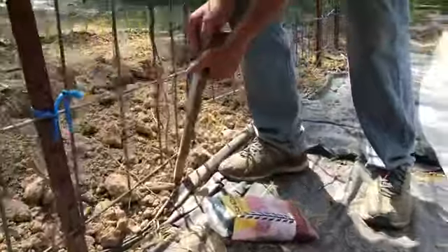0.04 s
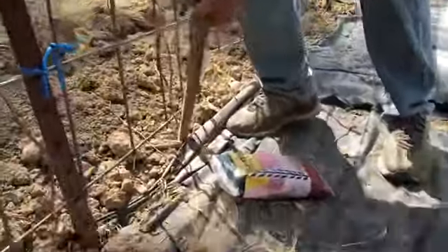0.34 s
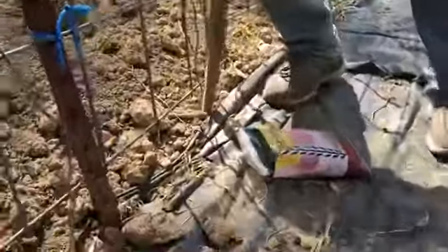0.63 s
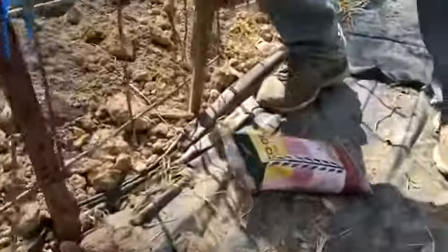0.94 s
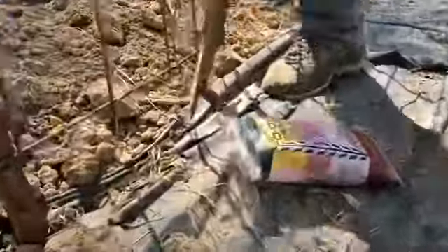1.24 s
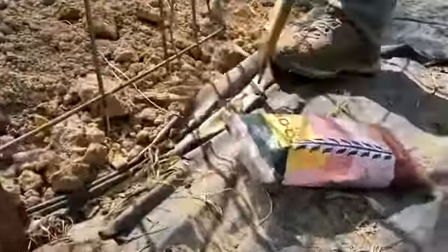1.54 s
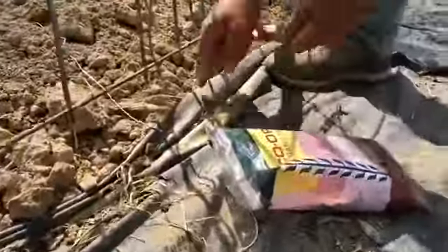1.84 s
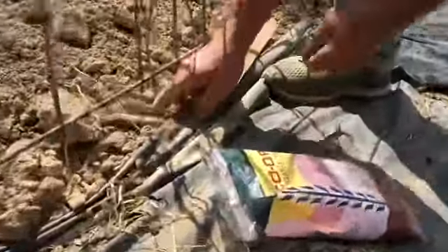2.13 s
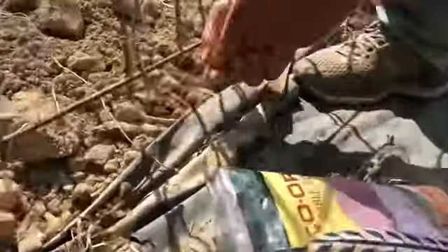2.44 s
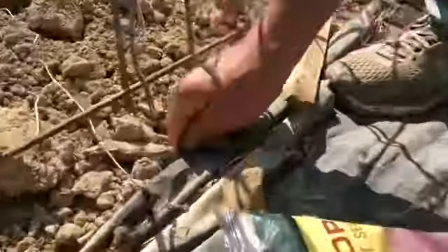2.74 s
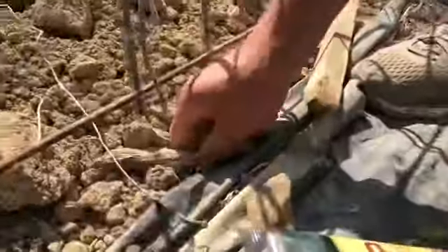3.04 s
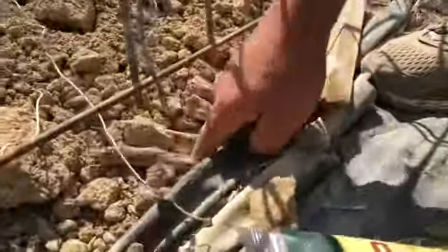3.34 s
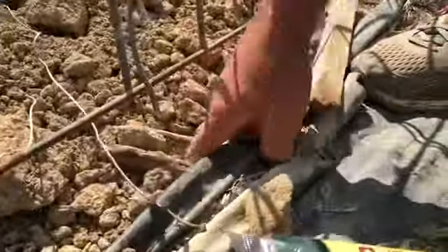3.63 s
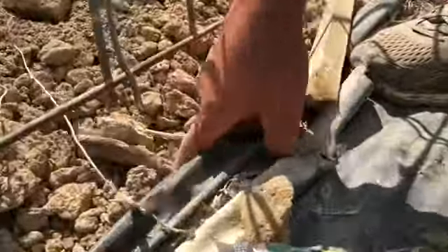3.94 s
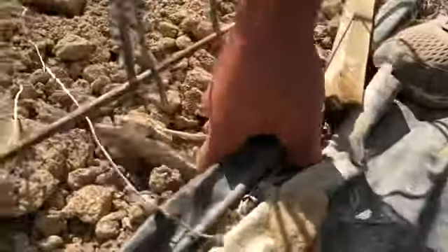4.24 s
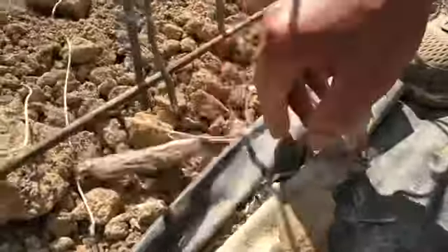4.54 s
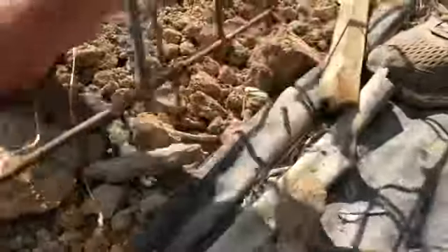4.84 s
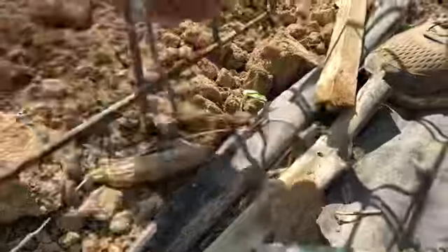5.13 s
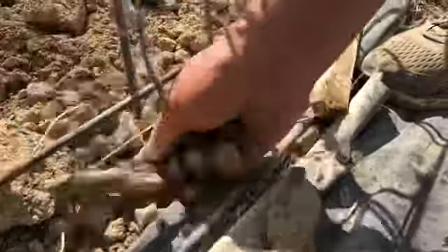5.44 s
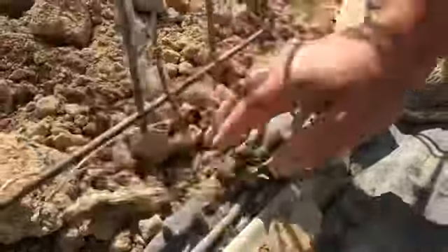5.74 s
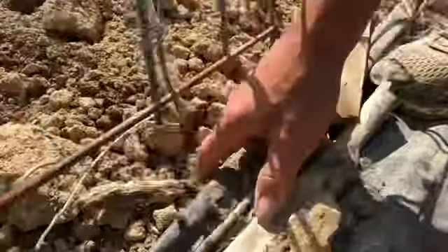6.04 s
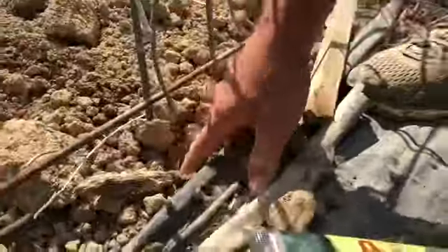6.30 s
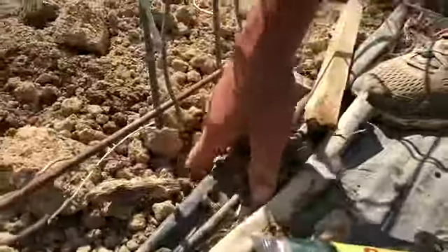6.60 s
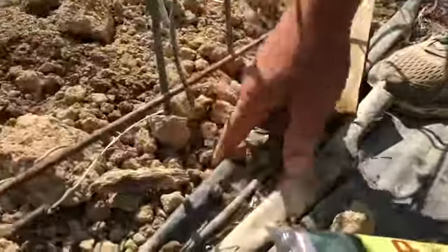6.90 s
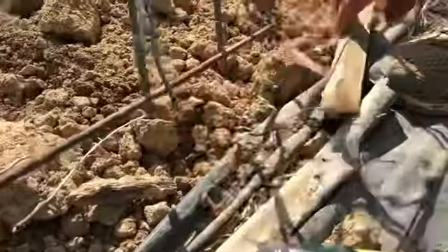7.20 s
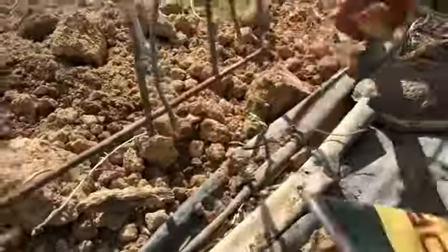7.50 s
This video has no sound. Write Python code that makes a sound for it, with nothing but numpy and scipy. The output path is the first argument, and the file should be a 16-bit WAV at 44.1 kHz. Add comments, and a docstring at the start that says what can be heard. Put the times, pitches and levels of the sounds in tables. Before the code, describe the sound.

Close, gritty rustling of a hand working loose garden earth, with ticking crumbs, soft shoe bumps and faint high birdsong.

```python
"""Fingers rake and press loose, dry soil: sowing by hand in a garden bed, a phone close above it.
Clods crumble, dust slides and earth packs under each stroke; crumbs tick on the woven ground cover.
Shoes shift with dull bumps, and at the end a shoe or the wooden dibber grinds on grit.
Small birds sing thinly a few trees away, over a faint outdoor rumble."""
import sys
import numpy as np
from scipy import signal
from scipy.fft import rfft, irfft, next_fast_len
from scipy.io import wavfile
from scipy.ndimage import uniform_filter1d

SR = 44100
rng = np.random.default_rng(int(sys.argv[2]) if len(sys.argv) > 2 else 0)


def generate_wav(signal):
    """Clip the signal to [-1, 1] and save it as 16-bit WAV at the path in sys.argv[1]."""
    frames = np.transpose(np.atleast_2d(signal))
    scaled = np.clip(frames, -1, 1) * 32767
    pcm = np.round(scaled).astype(np.int16)
    wavfile.write(sys.argv[1], SR, pcm)


N = 333427
T = np.arange(N) / SR
TOP_HZ = 15900


def undb(db):
    """Decibels to amplitude."""
    return 10 ** (np.asarray(db) / 20)


def add(out, s, sound):
    """Mix a sound in at s seconds."""
    i = max(int(round(s * SR)), 0)
    part = sound[:max(N - i, 0)]
    out[i:i + len(part)] += part


def colour(x, points):
    """Causal filter through (Hz, dB) points, so that grains keep their sharp fronts; rms 1."""
    hz, db = np.transpose(points)
    size = next_fast_len(N + 8192, real=True)
    f = np.arange(size // 2 + 1) * SR / size
    gain = undb(np.interp(np.log(f + 1), np.log(hz), db))
    cepstrum = irfft(np.log(gain), size)
    cepstrum[1:size // 2] *= 2
    cepstrum[size // 2 + 1:] = 0
    y = irfft(rfft(x, size) * np.exp(rfft(cepstrum)), size)[:N]
    return y / y.std()


def walk(rate):
    """Random levels joined by slopes, rate of them a second; spread near 1."""
    knots = rng.standard_normal(N // 20)
    return np.sqrt(3 / 2) * np.interp(T * rate, np.arange(len(knots)), knots)


def stroke(s, length, rise, fall):
    """Envelope of a contact that ramps up, holds and dies away; times in seconds."""
    return np.clip((T - s) / rise + .5, 0, 1) * np.exp(-np.clip((T - s - length) / fall, 0, 20))


def air(level_db=-60):
    """Faint rumble and hiss all round the garden, barely shifting in the breeze."""
    # Spectrum of the still air. Each row: frequency in Hz, relative level in dB.
    spectrum = [(20, -83), (40, -21), (70, -11.5), (115, 0), (180, 1), (280, -2), (450, -9.5), (900, -16.5),
                (2500, -25.5), (4800, -19), (7000, -26), (16000, -68)]
    breeze_db = .7 * walk(3)
    return undb(level_db + breeze_db) * colour(rng.standard_normal(N), spectrum)


def bird_note(points, waver=0.0019):
    """A near-pure note through (s, Hz, dB) points, fluttering in pitch and level; gives start, sound."""
    s, hz, db = np.transpose(points)
    t = np.arange(s.min(), s.max() + 0.0022, 1 / SR)
    shake = np.interp(t * 400, np.arange(512), rng.standard_normal(512))
    flutter_db = 3 * np.interp(t * 130, np.arange(512), rng.standard_normal(512))
    pitch = uniform_filter1d(np.interp(t, s, hz), size=200) * (1 + waver * shake)
    swell = undb(np.interp(t, s, db) + flutter_db) * signal.windows.tukey(len(t), .2)
    return s.min(), np.sqrt(2) * swell * np.sin(2 * np.pi * np.cumsum(pitch) / SR)


def bird_song(repeats=4, period_s=.218, first_db=-4):
    """A songbird repeats its motif at an even pace, never quite alike; each phrase starts softly."""
    # The motif, one list a note. Each point: seconds into the motif, pitch in Hz, relative level in dB.
    motif = [
        [(0, 7110, -5.5), (.018, 7000, 0.5), (.032, 7200, -17)],
        [(.03, 6530, 8), (.036, 5780, 0), (.058, 5740, -24)],
        [(.054, 7950, -2), (.061, 9570, -2.5), (.068, 9300, -4)],
        [(.078, 5440, -5), (.095, 5070, 5.5), (.128, 4910, -12.5)],
        [(.135, 6530, -1), (.141, 5800, 1.5), (.156, 5550, -11)],
        [(.157, 4640, -34), (.165, 4490, -5), (.174, 4090, -7.5)],
    ]
    # Phrases sung. Each row: start in seconds, relative level in dB.
    phrases = [(1.359, -48.5), (3.953, -48), (6.309, -48.5)]
    out = np.zeros(N)
    for s, db in phrases:
        for k in range(repeats):
            motif_db = db + first_db * (k == 0)
            for points in motif:
                detune, accent_db = rng.standard_normal(2)
                start, sound = bird_note(np.array(points) * [1, 1 + .006 * detune, 1], waver=.02)
                add(out, s + k * period_s + start, undb(motif_db + accent_db) * sound)
    return out


def bird_calls(chip_hz=15900, chip_end_hz=12000):
    """Small birds give thin whistles, squeaks and very high falling chips."""
    # Whistles, one list a call. Each point: time in seconds, pitch in Hz, relative level in dB.
    whistles = [
        [(.49, 7500, -66), (.51, 8600, -57), (.527, 8900, -47), (.543, 8500, -50)],
        [(.62, 8900, -62), (.65, 7150, -56), (.705, 6750, -57), (.78, 7300, -59), (.82, 7850, -51),
         (.87, 8000, -55), (.937, 7950, -51)],
        [(5.18, 7400, -45), (5.215, 8700, -53), (5.25, 9150, -68), (5.33, 8300, -51)],
        [(7.35, 10700, -49), (7.37, 10300, -55), (7.385, 10700, -49), (7.4, 7800, -48)],
    ]
    # Chips. Each row: start in seconds, relative level in dB.
    chips = [(.06, -66), (.16, -52), (7.11, -49), (7.211, -47), (7.303, -46)]
    out = np.zeros(N)
    for points in whistles:
        add(out, *bird_note(points))
    middle_hz = (chip_hz + chip_end_hz) / 2
    for s, db in chips:
        glide = [(s, chip_hz, db - 5), (s + 0.016, middle_hz, db), (s + 0.036, chip_end_hz, db - 4)]
        add(out, *bird_note(glide, waver=.01))
    return out


def birds(song_db=-7, calls_db=-4, echo_db=-5.5, echo_s=0.062, leaves_hz=12000):
    """Song and calls from a few trees away; the foliage sends back a short, duller echo."""
    song, calls = bird_song(), bird_calls()
    t = T[:SR // 2]
    leaves = signal.butter(2, leaves_hz, fs=SR, output="sos")
    trees = signal.sosfilt(leaves, rng.standard_normal(len(t))) * np.exp(-t / echo_s)
    echo = signal.fftconvolve(song + .5 * calls, trees / np.linalg.norm(trees))[:N]
    return undb(song_db) * song + undb(calls_db) * calls + undb(echo_db) * echo


def thuds():
    """Soft ground answers a shoe or the heel of a hand with a dull, heavily damped bump."""
    # Weight set down. Each row: start in seconds, level in dB, pitch in Hz, length in seconds.
    bumps = [(0.344, -54.5, 103, 0.092), (0.814, -51, 121, 0.028), (0.915, -57.5, 113, 0.055),
             (1.303, -51, 258, 0.0096), (4.601, -50, 237, 0.035), (5.364, -63, 221, 0.19),
             (7.417, -60, 197, 0.069), (7.513, -73, 240, .05)]
    out = np.zeros(N)
    for s, db, hz, length in bumps:
        band = signal.butter(2, [hz / 1.22, hz * 1.31], "band", fs=SR, output="sos")
        bump = signal.sosfilt(band, rng.standard_normal(N))
        out += undb(db) * bump / bump.std() * stroke(s, length, rise=0.0082, fall=0.0067)
    return out


def tick(hz, q=1.68, spread_s=0.001998, low_hz=400, tail_s=0.0022, ground_hz=700, size=2048):
    """A snap on the sheet: a damped resonance whose high bending waves arrive first; fragments patter."""
    f = np.maximum(np.arange(size // 2 + 1) * SR / size, 1)
    body = 1 / (1 + 1j * q * (f / hz - hz / f)) / (1 - 1j * low_hz / f)
    # a big, low crumb also knocks the ground beneath
    ground = 2j / (1 + 1j * (f / ground_hz - ground_hz / f)) ** 2
    body += undb(-9) * min(ground_hz / hz, 1) * ground
    # and it touches for longer, which dulls its treble
    body /= (1 + 1j * f / (2.4 * hz)) ** 2
    # bending waves travel at a speed that goes with the root of frequency
    lag_cycles = spread_s * (2 * np.sqrt(1000 * f) - f * np.sqrt(1000 / TOP_HZ))
    ring = irfft(body * np.exp(-2j * np.pi * lag_cycles), size)
    patter = irfft(body * rfft(rng.standard_normal(size)), size) * np.exp(-T[:size] / tail_s)
    snap = ring / abs(ring).max() + undb(-12) * 2 * patter / abs(patter).max()
    return snap[:size // 2]


def crumbs(clod_power, count=190, above_db=10, spread_db=4, centre_hz=2900):
    """Distinct snaps, and small crumbs that tumble at random, as loud as the hand is busy."""
    # Crumbs and grit snapping on the sheet or under the dibber.
    # Each row: start in seconds, rough peak level in dB, pitch in Hz.
    snaps = [(0.3263, -33, 1980), (0.3753, -30, 6200), (.377, -41.5, 690), (0.5793, -27.5, 2600),
             (0.89, -36, 7800), (1.0017, -20.5, 3440), (1.3343, -41.5, 1120), (1.469, -30, 2900),
             (1.885, -40, 3100), (1.5128, -28.5, 1680), (1.9682, -22.5, 6060), (2.0463, -21, 2170),
             (2.6262, -29, 2200), (2.761, -34.5, 2460), (2.828, -28.5, 2900), (3.028, -37, 3120),
             (3.2966, -18, 5000), (3.585, -30, 3250), (4.6242, -22.5, 5500), (4.6322, -28.5, 2810),
             (4.6583, -33.5, 2900), (4.7856, -13.5, 11000), (4.8016, -26, 10100), (5.2389, -31, 3300),
             (5.2652, -35, 4100), (5.2936, -27.5, 3800), (5.372, -21.5, 5900), (5.4273, -21, 2750),
             (5.4945, -28, 3400), (6.1201, -29, 2350), (6.596, -26, 4440), (6.731, -34, 2130),
             (7.418, -22, 2620), (7.4815, -11, 6800), (7.499, -22.5, 2100), (7.509, -26, 4600),
             (7.519, -10, 7500), (7.5239, -15.5, 3180), (7.528, -16, 6630), (7.5455, -14, 5600),
             (7.5527, -13, 7140)]
    out = np.zeros(N)
    for s, db, hz in snaps:
        add(out, s, undb(db) * tick(hz))
    for when, size, pitch in rng.random((count, 3)):
        busy = np.sqrt(clod_power[int(when * N)])
        gain = busy * undb(above_db + spread_db * (2 * size - 1))
        add(out, when * N / SR, gain * tick(centre_hz * 2 ** (2 * pitch - 1)))
    return out


def effort(sag_db_per_s=11.5, pause_db=-6.5, pause_edge_s=0.002):
    """Power of clods, dust and earth as the bed is worked; the soil gives way as a stroke goes on."""
    # Light rustle between strokes. Each row: time in seconds, relative level in dB.
    rustle = [(0.0, -62.5), (0.25, -68), (0.41, -58.5), (0.72, -57.5), (2.14, -54), (2.4, -54.5),
              (3.23, -60.5), (3.35, -54.5), (3.72, -55.5), (4.93, -57.5), (5.49, -46.5), (6.17, -61),
              (6.52, -57), (6.8, -60.5), (7.05, -60), (7.38, -69)]
    # Offsets from that level in dB for clods, dust and earth.
    offsets_db = [-3, -2.5, -11.5]
    # All but the last row: strokes of fingers, dibber or shoe. Last row: the faint hissy tail of a
    # high bird chip. Each row: start in seconds, length in seconds, relative clod level in dB,
    # then the dust and earth layers in dB against the clods.
    swells = [(.175, .08, -64, 5.5, -15), (.255, 0.049, -53, 2.5, -2.5), (.345, .1, -53.5, -2, -10.5),
              (.46, .12, -52.5, -2.5, -11), (.738, 0.054, -53, -6, -7), (.972, 0.076, -49, -8.5, -25),
              (1.188, 0.043, -51.5, -6, -8), (1.325, 0.054, -54, -16, -6), (1.447, 0.15, -50, -7.5, -9),
              (1.675, 0.031, -47, 3, -3.5), (1.93, 0.15, -50.5, 1.5, -7), (2.19, 0.057, -58.5, 2.5, -3),
              (2.41, 0.027, -60.5, 7.5, -27), (2.485, 0.03, -57, 0, -7), (2.655, 0.069, -73, -6, -16),
              (2.775, 0.12, -54.5, 0, -9.5), (2.97, 0.052, -52, -8, -19), (3.17, .19, -49, -0.5, -10),
              (3.42, 0.06, -54.5, 6, -7), (3.585, 0.17, -48, -3, -12), (3.78, .125, -54.5, 1.5, -24),
              (3.955, 0.032, -52.5, -2, -21), (4.012, 0.032, -44, -8, -18), (4.1, 0.066, -56, -3.5, -8),
              (4.32, 0.054, -48, -2.5, -12), (4.438, 0.046, -47, 1, -5.5), (5.0, .08, -54, -2, -8),
              (5.085, 0.069, -45.5, -1, -3.5), (5.335, 0.087, -38, -3.5, -12),
              (5.41, 0.16, -41, -3.5, -9.5), (5.58, .08, -47.5, -3, -6.5), (5.705, 0.079, -46, 0, -6.5),
              (5.85, 0.12, -48, -1.5, -8.5), (6.078, 0.073, -47.5, -6, -17), (6.16, 0.056, -58.5, -13, -8),
              (6.282, 0.088, -51.5, -2.5, -10), (6.385, 0.098, -52, -11, -30),
              (6.535, 0.15, -49.5, -4.5, -27), (6.72, 0.11, -57, 0.5, -14), (6.848, 0.065, -48.5, -3.5, -5),
              (6.97, 0.037, -52, -3, -11), (7.222, 0.027, -64, 7.5, -2)]
    # Abrupt scuffs of hand, shoe or dibber. Each row reads as for the swells.
    scuffs = [(1.508, 0.0089, -40.5, -13, 2), (1.884, 0.0071, -50, -2, 1.5),
              (1.927, 0.011, -41.5, -4.5, -1), (2.164, .018, -39.5, -2, -5.5),
              (3.166, 0.036, -48, -28, -27), (3.869, 0.026, -42.5, -4, -10.5),
              (4.606, 0.033, -42, -3.5, -10.5), (4.774, 0.0073, -54, 2, -10),
              (4.805, 0.0043, -43.5, 3, -3.5), (5.36, 0.024, -32.5, -8.5, -13),
              (7.414, 0.005, -33, -1, -3.5), (7.425, 0.042, -42, -7, 2), (7.438, 0.0064, -32.5, -6, 1),
              (7.476, 0.043, -42, -3, -3), (7.5065, 0.025, -28.5, -10, -5), (7.53, .04, -37, -1.5, -2)]
    # The hand lifts or rests. Each row: start in seconds, length in seconds.
    pauses = [(0.296, 0.012), (1.27, .03), (2.378, 0.031), (2.455, 0.032), (2.545, 0.097), (3.07, 0.068),
              (4.563, 0.029), (4.84, 0.14), (6.046, 0.02), (6.226, 0.056), (6.759, 0.021), (7.05, .11)]
    rustle_db = np.interp(T, *np.transpose(rustle))
    power = undb(rustle_db + np.array(offsets_db)[:, None]) ** 2
    for events, rise_s, fall_s in (swells, 0.021, 0.011), (scuffs, .00095, 0.0058):
        for s, length, db, dust_db, earth_db in events:
            sag_db = sag_db_per_s * np.clip(T - s - length / 2, -length / 2, length / 2)
            envelope = stroke(s, length, rise_s, fall_s) * undb(db - sag_db)
            power += np.outer(undb([0, dust_db, earth_db]) ** 2, envelope ** 2)
    resting = sum(stroke(s, length, pause_edge_s, pause_edge_s) for s, length in pauses)
    return power * undb(pause_db * resting) ** 2


def grains(rate, spread_db, smooth):
    """Tiny impacts of very unequal size, about rate a second, over a smooth bed of still finer ones."""
    size = undb(spread_db * np.minimum(rng.exponential(size=N), 4))
    hits = (rng.random(N) < rate / SR) * size * np.sign(rng.standard_normal(N))
    return hits / hits.std() + smooth * rng.standard_normal(N)


def wander(x, depth_db, rate=25, lowest_hz=700):
    """Grains of other sizes keep coming under the fingers: each half octave swells and fades alone."""
    size = next_fast_len(N, real=True)
    spectrum = rfft(x, size)
    f = (np.arange(len(spectrum)) + 1) * SR / size
    half_octaves = np.clip(2 * np.log2(f / lowest_hz), 0, 9)
    out = np.zeros(N)
    for k in range(10):
        band = irfft(spectrum * np.maximum(1 - abs(half_octaves - k), 0), size)[:N]
        out += band * undb(depth_db * walk(rate))
    return out / out.std()


def soil(power, trims_db=(0.3, 2.5, -.5)):
    """Just under the microphone clods crumble, dust slides and earth packs, all slipping together."""
    # Spectra of the three kinds of grain. Each row: frequency in Hz, relative level in dB.
    clod_spectrum = [(500, -22.5), (1000, -17.5), (1600, -1.5), (2300, 2), (3600, -0.5), (4700, -14),
                     (6500, -25), (9000, -35), (16000, -7)]
    dust_spectrum = [(1500, -17), (3500, 5), (5000, 4.5), (6800, 6.5), (9000, 3), (12000, 3.5), (16000, -5)]
    earth_spectrum = [(40, -46), (120, -16), (280, -0.5), (470, 2), (800, 2), (1400, 3), (2500, -17),
                      (6000, -61)]
    slip = undb(1.7 * walk(55) + 1.4 * walk(300))
    clods = colour(grains(rate=1600, spread_db=4, smooth=.55), clod_spectrum)
    dust = colour(grains(rate=6000, spread_db=4, smooth=.64), dust_spectrum)
    earth = colour(grains(rate=500, spread_db=5, smooth=1), earth_spectrum)
    layers = [wander(clods, depth_db=2.6), wander(dust, depth_db=1.6), earth]
    return slip * sum(layer * np.sqrt(p) * undb(db) for layer, p, db in zip(layers, power, trims_db))


def scene():
    """One microphone close above the bed hears everything."""
    power = effort()
    return (soil(power) + crumbs(power[0]) + thuds() + birds() + air())[None]


def record(dry, low_cut_hz=55, dip_hz=5000, dip_db=-3, dip_width_hz=900):
    """The phone thins the deep bass, has a shallow dip in the treble and cuts the top."""
    sound = signal.sosfilt(signal.butter(3, low_cut_hz, "high", fs=SR, output="sos"), dry)
    dip_band = signal.lfilter(*signal.iirpeak(dip_hz, dip_hz / dip_width_hz, fs=SR), sound)
    sound = sound + (undb(dip_db) - 1) * dip_band
    return signal.sosfilt(signal.ellip(10, .2, 70, TOP_HZ, fs=SR, output="sos"), sound)


dry = scene()
out = record(dry)
generate_wav(out)
```